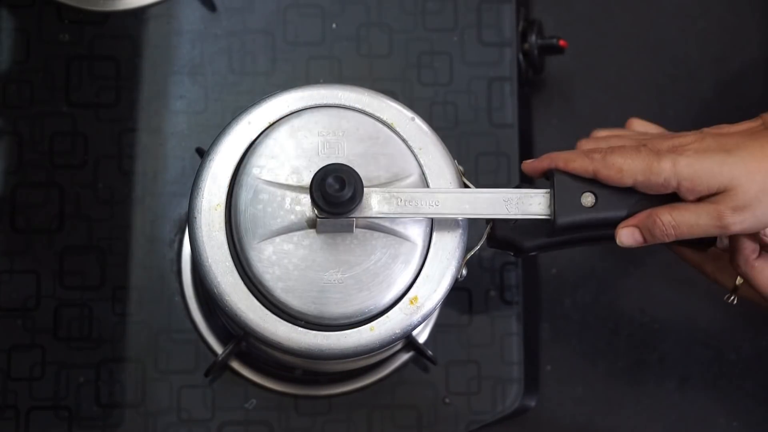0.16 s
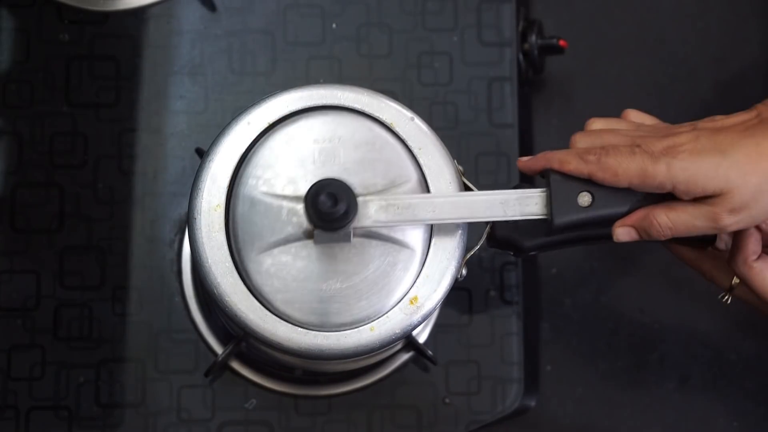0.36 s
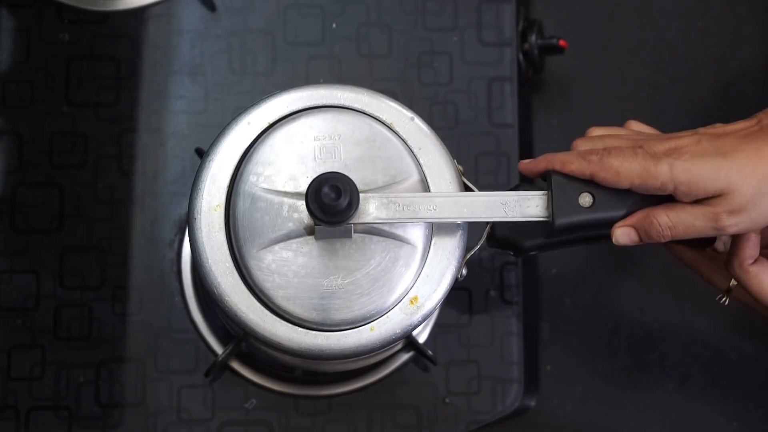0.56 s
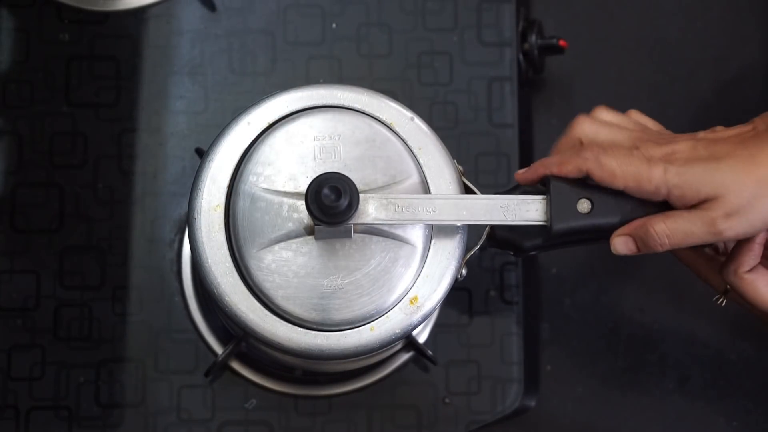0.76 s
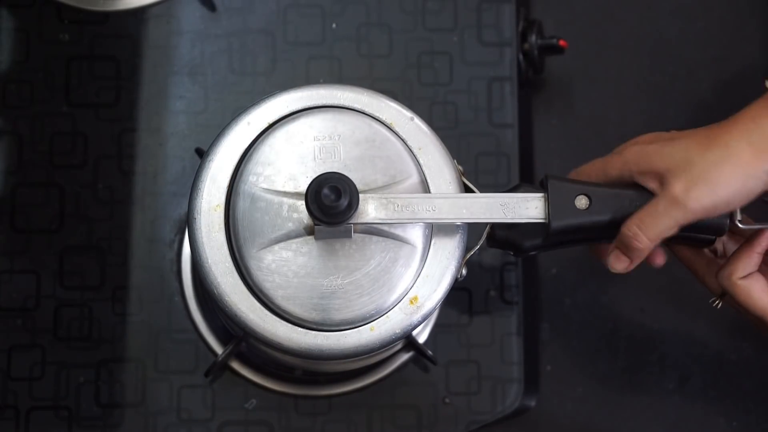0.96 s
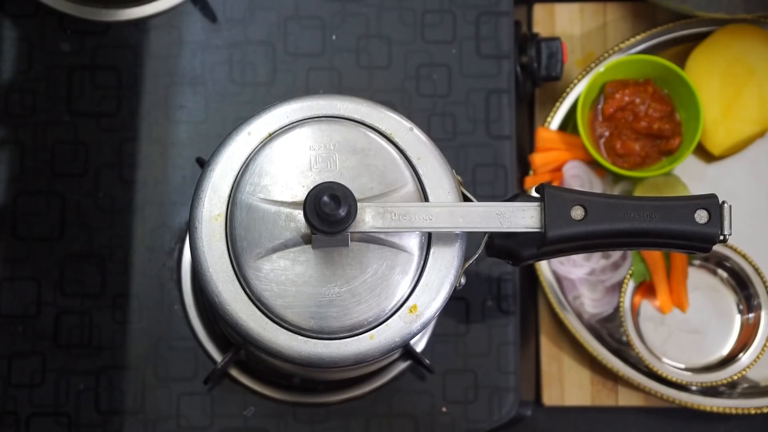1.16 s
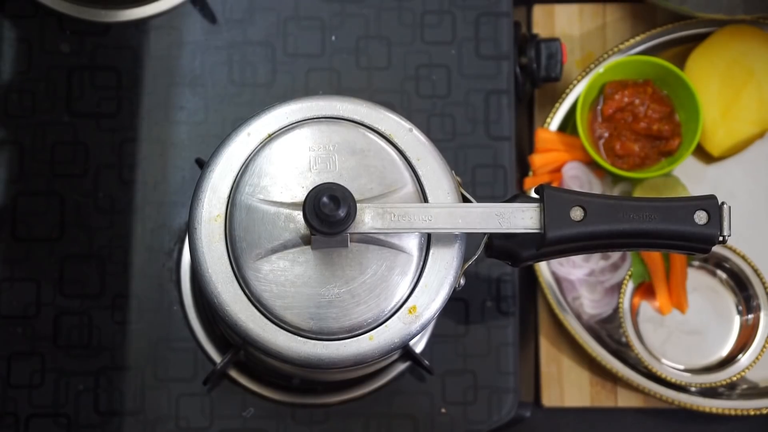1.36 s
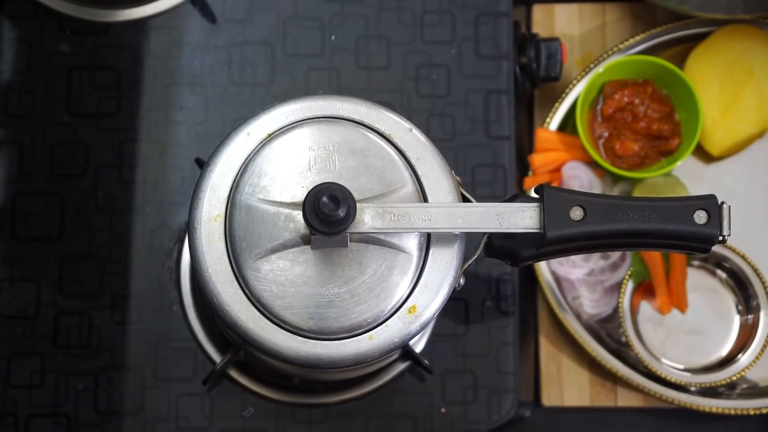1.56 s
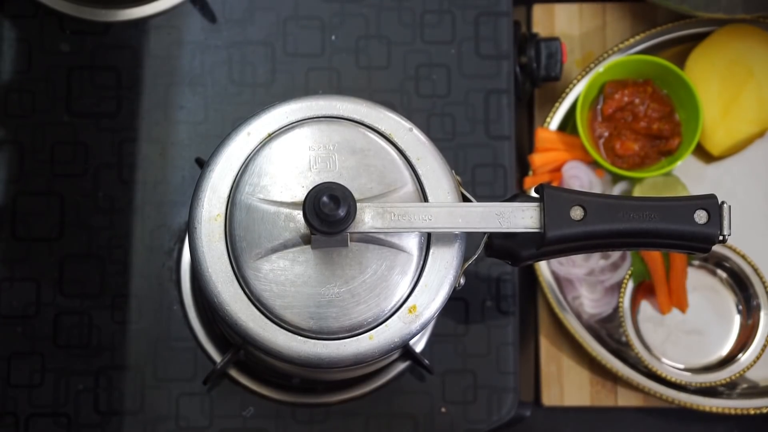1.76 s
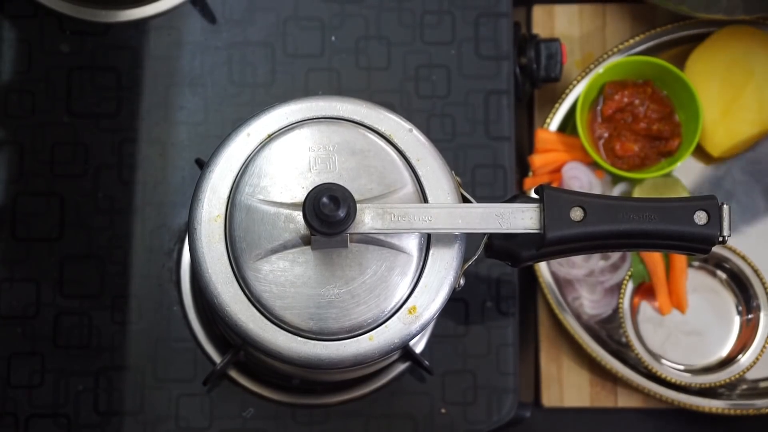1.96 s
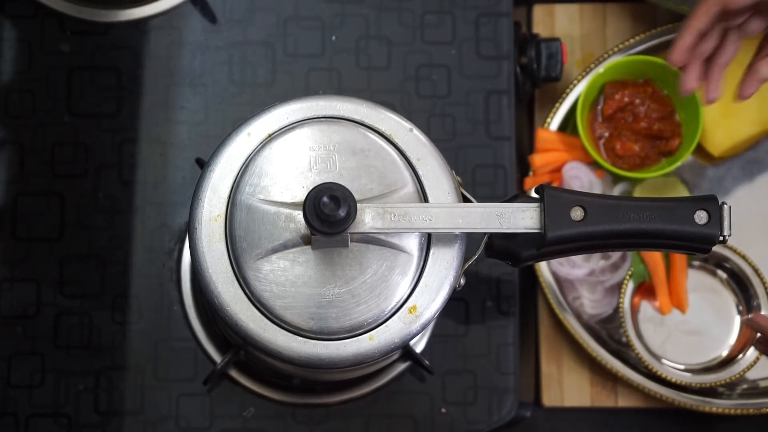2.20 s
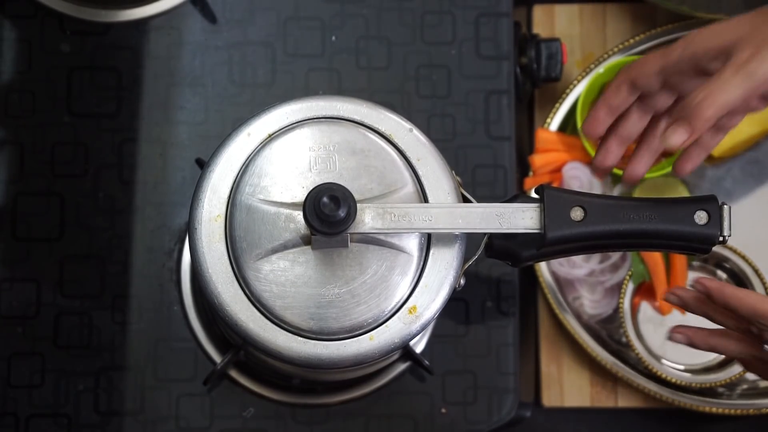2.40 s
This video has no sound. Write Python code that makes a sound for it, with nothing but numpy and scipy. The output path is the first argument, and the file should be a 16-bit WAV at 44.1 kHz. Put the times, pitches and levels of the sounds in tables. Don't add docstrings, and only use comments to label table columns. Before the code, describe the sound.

A metal pressure cooker lid closes in a reverberant kitchen, heard close over faint room noise and low hum. Knocks and loose sliding rattle at 0-0.15 s, with the pot rocking dully. A strong thump and ringing clank come around 0.4 s, a duller drop at 0.6 s, a sharp latch snap at 0.82 s, a tiny click at 0.97 s and faint clip rasp near 1.18 s. After a brief gap at 1.2 s, quieter room tone fades in, with faint glassy ticks at 1.37 and 1.5 s.

```python
import sys
import numpy as np
from scipy import signal
from scipy.io import wavfile

SR = 44100
rng = np.random.default_rng(int(sys.argv[2]) if len(sys.argv) > 2 else 0)


def wav_record(signal):
    frames = np.transpose(np.atleast_2d(signal))
    bounded = np.clip(frames, -1, 1)
    quanta = np.round(bounded * 32767).astype(np.int16)
    wavfile.write(sys.argv[1], SR, quanta)


def makeup_ratio(level_db):
    decades = np.asarray(level_db, float) / 20
    return 10 ** decades


N = 107339
LEAD = SR // 10

# (frequency [Hz], level [dB])
EARLY_AIR = [(30, -10), (70, 2.5), (125, -6.5), (245, 0.5), (1300, -6.5), (2000, -10), (5000, -18),
             (16000, -36.5)]
LATER_AIR = [(30, -18), (50, -3), (125, -15.5), (245, -8), (420, -10.5), (1500, -15), (2100, -22),
             (5000, -33.5), (16000, -49.5)]
# (frequency [Hz], likeness [0 to 1])
LIKENESS = [(30, .9995), (120, 0.95), (300, 0.9), (600, 0.79), (1500, 0.44), (3000, 0.32), (8000, 0.041)]
# (frequency [Hz], time to fall 60 dB [s])
ROOM_T60 = [(150, 0.65), (500, 0.55), (2500, 0.71), (6000, 0.61), (14000, 0.25)]
# (frequency [Hz], level [dB])
ROOM_WET = [(150, -12), (500, -5), (2000, -3), (8000, 1), (15000, -0.5)]
# (time [s], level [dB])
FADE_OUT = [
    (0, 0),
    (1.0, 0),
    (1.2065, -4),
    (1.2085, -24),
    (1.2135, -42),
    (1.226, -56),
    (1.228, -90),
]

# (time [s], level [dB], rattle length [s])
TICKS = [
    (1.374, -39, .02),
    (1.492, -40, 0.002),
    (1.508, -48, .002),
]
# (time [s], level [dB], rattle length [s])
THUDS = [
    (-.03, -17, 0.0099),
    (.132, -23, 0.0033),
    (.388, -18.5, 0.0033),
    (.407, -13.5, 0.022),
    (.44, -18.5, 0.02),
    (.5805, -21, 0.011),
    (.598, -16, 0.0053),
    (.725, -27, 0.0035),
    (.83, -24, 0.0084),
]
# (time [s], level [dB], frequency [Hz], time to fall 60 dB [s])
ROCKS = [(-.005, -27, 248.7, 0.23), (.002, -21, 463, 0.08), (0.027, -21, 382, 0.069),
         (.042, -20.5, 500, 0.053), (.055, -23.5, 572, 0.087), (0.114, -22, 293, .1),
         (0.132, -16.5, 265, 0.028), (.149, -16.5, 195, 0.035), (.388, -17.5, 277, 0.13),
         (.423, -21.5, 268, 0.054), (.442, -20.5, 268, 0.077), (.481, -20.5, 260, 0.066),
         (.515, -32.5, 276, 0.16), (.586, -22.5, 310, 0.079), (.595, -19, 233, 0.036),
         (.614, -24, 254.4, 0.14), (0.652, -19, 235, 0.02), (.727, -30, 413, 0.06)]
# (time [s], level [dB], rattle length [s])
KNOCKS = [
    (-.02, -6.5, 0.015),
    (.006, -14, 0.061),
    (.04, -18, 0.036),
    (.126, -17.5, 0.0057),
    (.378, -26, 0.0017),
    (.390, -11.5, 0.012),
    (.425, -14, 0.09),
    (.5985, -18, 0.003),
    (.805, -22.5, 0.0056),
    (1.187, -23.5, 0.0058),
]
# (time [s], level [dB], rattle length [s])
SLIDES = [
    (-.02, -17, 0.043),
    (.019, -14, 0.029),
    (.127, -22.5, 0.013),
]
# (time [s], level [dB], rattle length [s])
GRAZES = [
    (.016, -14.5, 0.016),
    (.4105, -11, 0.0093),
]
# (time [s], level [dB], rattle length [s])
CLANKS = [
    (.4255, -13, 0.03),
    (.449, -28, 0.03),
]
# (time [s], level [dB], rattle length [s])
DROPS = [
    (.5992, -18, 0.0031),
    (.65, -33, 0.0024),
]
# (time [s], level [dB], frequency [Hz], time to fall 60 dB [s])
RINGS = [
    (.4255, -30, 7537, 0.15),
    (.428, -31.5, 5324, .2),
    (.43, -33, 4830, .15),
    (.449, -31, 2681, 0.12),
    (.5992, -26, 1520, 0.022),
    (.5992, -22, 1910, 0.012),
    (.6, -41, 5280, .12),
    (.6, -37, 4740, 0.051),
]
# (time [s], level [dB])
EDGES = [
    (.4262, -13),
    (.5995, -29),
    (.8166, -9.5),
    (.970, -26.5),
    (1.1885, -26),
]
# (time [s], level [dB], rattle length [s])
SNAPS = [
    (.8165, -6.5, 0.014),
    (.859, -15, 0.048),
    (.970, -22.5, 0.0064),
]
# (time [s], level [dB])
RASP_LEVEL = [
    (1.1768, -60),
    (1.178, -39),
    (1.186, -50),
    (1.1885, -39),
    (1.2055, -42),
    (1.2075, -60),
]

# (frequency [Hz], level [dB], time to fall 60 dB [s])
GLASS_MODES = [(3660, -3, 0.012), (4100, -9.5, 0.036), (4420, -2, 0.012), (4730, -9, 0.015)]
POT_MODES = [(180.9, -12, 0.36), (237, -4, 0.24), (274, -2.5, 0.066), (364, -8, 0.16), (429, -0.5, 0.11),
             (476, -6.5, 0.025), (566, -11, 0.02)]
WALL_MODES = [(443, -4.5, 0.051), (754, -7.5, 0.044), (926, -4, 0.045), (1114, -4.5, 0.11),
              (1290, -4, 0.13), (1470, 8.5, 0.036), (1830, -19, 0.028), (2038, -14, .03)]
RIM_MODES = [(2570, -3, 0.016), (3440, -4.5, .02), (4550, -6.5, 0.02), (4700, -10, .025), (5370, 1, 0.02),
             (7000, -2.5, 0.011), (7560, -3.5, 0.022)]
LID_MODES = [(2594, -5, 0.035), (2681, -8, 0.03), (3300, -8.5, 0.0081), (3780, -24, .02),
             (4180, -17, 0.017), (4580, -10.5, 0.02), (4780, -6.5, 0.02), (4880, -1.5, 0.047),
             (5180, -2.5, 0.028), (5330, -0.5, 0.012), (6940, 4, 0.012), (7500, -13, 0.02),
             (7600, -10.5, 0.042), (9000, -18, .02)]
LATCH_MODES = [(756, -7, 0.042), (1396, 0, 0.035), (1940, -11, 0.016), (2182, -4, 0.024),
               (2284, -1.5, 0.025), (2500, 0, 0.04), (2540, -8, .02), (2678, 1, 0.051), (2726, -1.5, 0.028),
               (2920, 2, 0.035), (2960, -21, 0.02), (4400, -4, 0.014), (4800, -1.5, 0.02),
               (5550, -5, 0.026)]
# (frequency [Hz], level [dB])
POT_CRACK = [(120, -15), (200, -8.5), (270, 7), (500, -1), (900, -11), (1500, -38)]
WALL_CRACK = [(400, -5.5), (900, -5.5), (1500, -1.5), (2200, -13.5), (4000, -16), (7000, -17)]
LID_CRACK = [(1500, -27), (2700, -2.5), (3600, -3.5), (5000, 3.5), (6000, -6.5), (7500, -10.5),
             (9000, -8.5), (15500, -25)]
DROP_CRACK = [(1200, -16), (1900, -1), (3600, -7.5), (5000, -9), (6200, -4), (9000, -8), (15500, -35)]
LATCH_CRACK = [(600, -20), (1500, -17), (2500, 6), (3600, -11), (5300, -0.5), (8000, -13), (13000, -12),
               (15000, -39)]
RASP_COLOUR = [(180, -16), (300, -6), (2140, -14), (2790, 0), (3600, -10), (4910, 5), (6300, -9),
               (16000, -12)]


def amp_at(rows, s):
    return makeup_ratio(np.interp(s, *np.transpose(rows)))


def at_hz(points, hz):
    table_hz, values = np.transpose(points)
    return np.interp(np.log(hz), np.log(table_hz), values)


def rms_one(x):
    return x / np.sqrt(np.mean(x ** 2) + 1e-20)


def bands():
    limits = 20 * 2 ** np.arange(0, 9.8, 1 / 3)
    return [(k, np.sqrt(low * high), signal.butter(2, [low, high], "band", fs=SR, output="sos"))
            for k, (low, high) in enumerate(zip(limits, limits[1:]))]


def drift(rate_hz):
    knots = rng.standard_normal(200)
    return np.interp(np.arange(N) / SR * rate_hz, np.arange(200), knots)


def stereo_noise(length, gain_of_band):
    out, white = 0, rng.standard_normal((2, 2, length))
    for k, hz, sos in bands():
        mid, side = signal.sosfilt(sos, white[k % 2])
        alike = np.clip(at_hz(LIKENESS, hz), 0, 1)
        stereo = np.sqrt(1 + alike) * mid + np.sqrt(1 - alike) * side * [[1], [-1]]
        out = out + gain_of_band(hz) * stereo
    return out


def air(spectrum):
    shared = drift(2.52)

    def gain_of_band(hz):
        patchy_db = 1.0 * (0.3 * shared + drift(8.36))
        return makeup_ratio(at_hz(spectrum, hz) + patchy_db)
    return rms_one(stereo_noise(N, gain_of_band))


def hum():
    pitch_hz = 97.7 + 0.35 * drift(5.4)
    waver = makeup_ratio(1.2 * drift(11.0))
    return np.sqrt(2) * waver * np.sin(2 * np.pi * np.cumsum(pitch_hz) / SR)


def kitchen(x, onset_s):
    t = np.arange(SR) / SR

    def gain_of_band(hz):
        t60 = at_hz(ROOM_T60, hz)
        return makeup_ratio(at_hz(ROOM_WET, hz) - 60 * t / t60) / np.sqrt(t60)
    echo = stereo_noise(SR, gain_of_band) * (1 - np.exp(-t / onset_s)) * makeup_ratio(-33)
    echo[:, 0] = 1
    echo[0, 5] = echo[1, 11] = makeup_ratio(-25)
    wet = signal.fftconvolve(x[None], echo, axes=1)[:, LEAD:N + LEAD]
    return wet * makeup_ratio(np.array([[0.5], [-0.5]]))


def coloured(x, spectrum):
    out = 0
    for k, hz, sos in bands():
        if spectrum[0][0] < hz < spectrum[-1][0]:
            out = out + (-1) ** k * makeup_ratio(at_hz(spectrum, hz)) * signal.sosfilt(sos, x + 1e-18)
    return out


def contacts(rows, rattle_db, spread_db, soft_hz):
    out, t = np.zeros(N + LEAD), np.arange(SR // 10) / SR
    touches_per_s = 2200
    for s, db, length in rows:
        chance, strength = rng.random((2, len(t)))
        touches = (chance < touches_per_s / SR) * (2 * strength - 1) * np.exp(-t / max(length, 1e-3))
        touches *= makeup_ratio(rattle_db) / np.sqrt(np.sum(touches ** 2) + 1e-9)
        touches[0] = 1
        i = int(s * SR) + LEAD
        out[i:i + len(t)] += makeup_ratio(db + spread_db * rng.standard_normal()) * touches
    r = np.exp(-2 * np.pi * soft_hz / SR)
    return signal.lfilter([1 - r], [1, -r], out + 1e-18)


def body(rows, modes, crack, ring_db, crack_db, rattle_db, soft_hz):
    out = makeup_ratio(crack_db) * coloured(contacts(rows, rattle_db, 0, soft_hz), crack)
    for hz, db, t60 in modes:
        r = makeup_ratio(-60 / (max(t60, 0.005) * SR))
        w = 2 * np.pi * hz / SR
        clicks = contacts(rows, rattle_db, 1.5, soft_hz)
        out += makeup_ratio(db + ring_db) * signal.lfilter([0, np.sin(w)], [1, -2 * r * np.cos(w), r * r], clicks)
    return out


def notes(rows, attack_s):
    out, age = np.zeros(N + LEAD), np.arange(SR // 3) / SR
    for s, db, hz, t60 in rows:
        i = int(s * SR) + LEAD
        envelope = makeup_ratio(db - 60 * age / t60) * (1 - np.exp(-age / attack_s))
        out[i:i + len(age)] += envelope * np.sin(2 * np.pi * hz * age) * 2
    return out


def far_ticks():
    return body(TICKS, GLASS_MODES, LID_CRACK, ring_db=-10.0, crack_db=-18, rattle_db=9.0, soft_hz=9240)


def pot():
    thuds = body(THUDS, POT_MODES, POT_CRACK, ring_db=-10, crack_db=14.5, rattle_db=2.0, soft_hz=700)
    knocks = body(KNOCKS, WALL_MODES, WALL_CRACK, ring_db=-22.0, crack_db=22.0, rattle_db=6.5, soft_hz=2960)
    return thuds + knocks + notes(ROCKS, attack_s=0.0056)


def lid():
    middle = LID_MODES[4:10]
    slides = body(SLIDES, RIM_MODES, LID_CRACK, ring_db=-11, crack_db=17.5, rattle_db=8.5, soft_hz=12000)
    grazes = body(GRAZES, middle, WALL_CRACK, ring_db=-15.5, crack_db=12.5, rattle_db=13.0, soft_hz=6000)
    clanks = body(CLANKS, LID_MODES, LID_CRACK, ring_db=-14.5, crack_db=17.0, rattle_db=9.5, soft_hz=11800)
    drops = body(DROPS, middle, DROP_CRACK, ring_db=-7, crack_db=17.0, rattle_db=5.5, soft_hz=10000)
    return slides + grazes + clanks + drops + notes(RINGS, attack_s=0.00054)


def bare_edges():
    clicks = np.zeros(N)
    for s, db in EDGES:
        clicks[int(s * SR) + np.array([0, 9, 23])] = makeup_ratio(db) * np.array([1, -0.8, 0.5])
    bright = signal.butter(2, [5000, 15000], "band", fs=SR, output="sos")
    tick = signal.sosfilt(bright, clicks + 1e-18)
    return np.array([tick, np.roll(tick, 3)])


def latch():
    return body(SNAPS, LATCH_MODES, LATCH_CRACK, ring_db=-18.5, crack_db=14, rattle_db=4, soft_hz=14000)


def rasp():
    touches_per_s = 14000
    grit = rng.standard_normal(N + LEAD) * (rng.random(N + LEAD) < touches_per_s / SR)
    t = (np.arange(N + LEAD) - LEAD) / SR
    sliding = (t > 1.17) * (t < 1.22)
    return rms_one(coloured(grit, RASP_COLOUR)) * makeup_ratio(11) * amp_at(RASP_LEVEL, t) * sliding


def scene():
    t = np.arange(N) / SR
    motor = hum()
    cooker = pot() + lid() + latch() + rasp()
    no_rumble = signal.butter(2, 130, "high", fs=SR, output="sos")
    cooker = signal.sosfilt(no_rumble, cooker)
    first = kitchen(cooker, onset_s=0.0026) + bare_edges()
    first = first + makeup_ratio(-38.5) * air(EARLY_AIR) + makeup_ratio(-42.5) * motor
    later = makeup_ratio(-41.5) * air(LATER_AIR) + makeup_ratio(-48) * motor
    fade_in = np.clip((t - 1.235) / 0.2, 0, 1) ** 1.2
    return first * amp_at(FADE_OUT, t) + later * fade_in + kitchen(far_ticks(), onset_s=0.005)


def low_pass(x):
    return signal.sosfilt(signal.butter(12, 16510, fs=SR, output="sos"), x)


def record(dry):
    rounded = 0.69 * np.tanh(dry / 0.7)
    treble_cut = signal.cheby2(10, 60, 16700, fs=SR, output="sos")
    mix = signal.sosfilt(treble_cut, rounded)
    return low_pass(mix)


dry = scene()
out = record(dry)
wav_record(out)
```